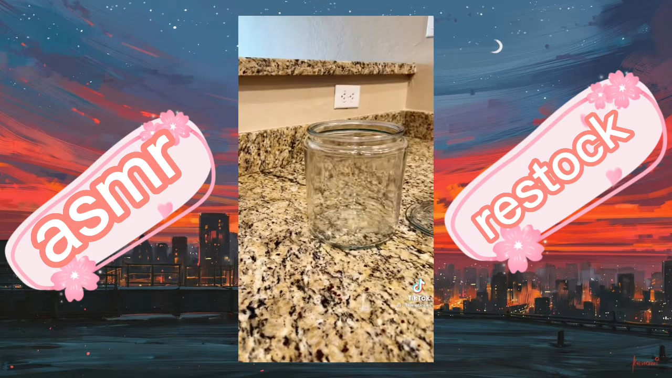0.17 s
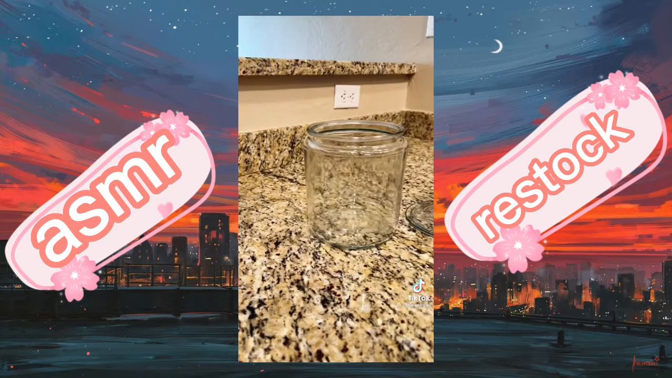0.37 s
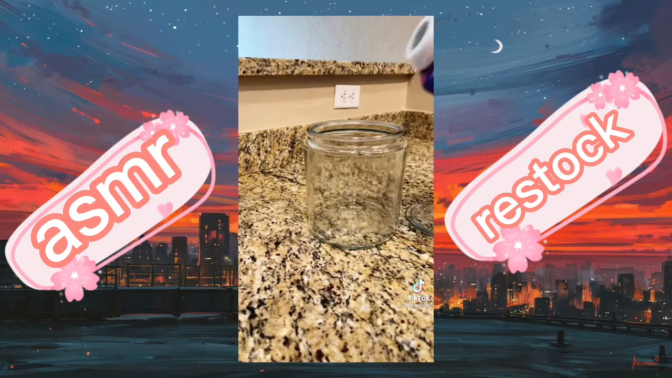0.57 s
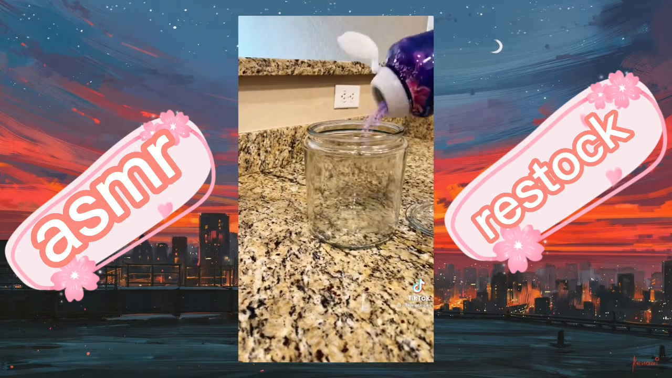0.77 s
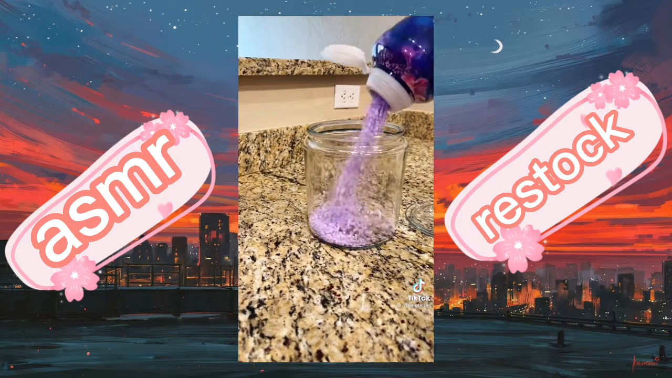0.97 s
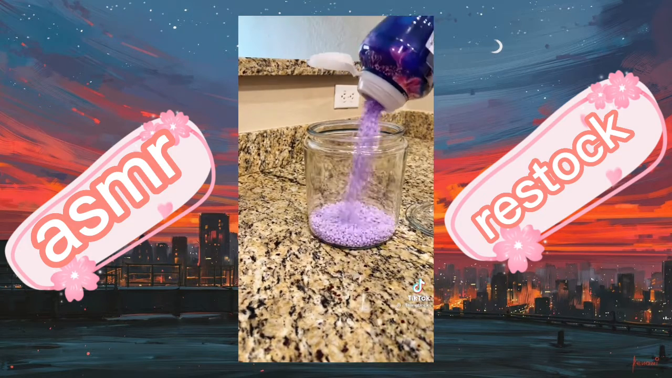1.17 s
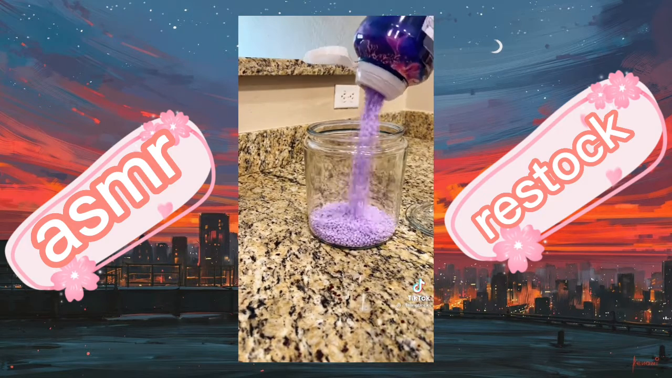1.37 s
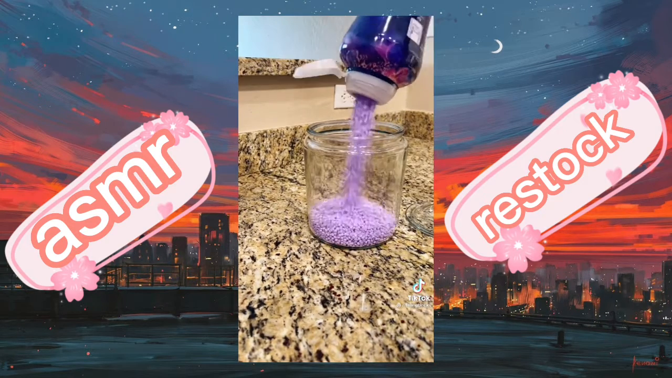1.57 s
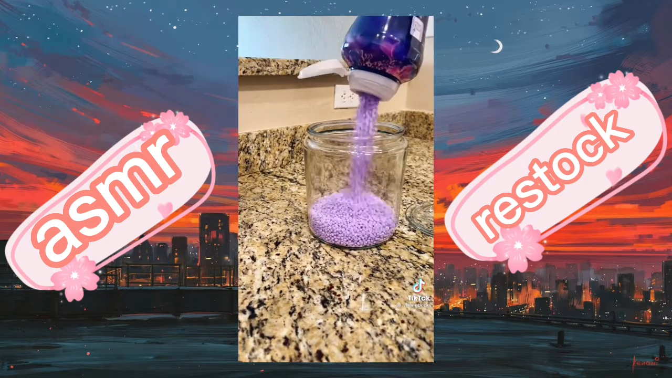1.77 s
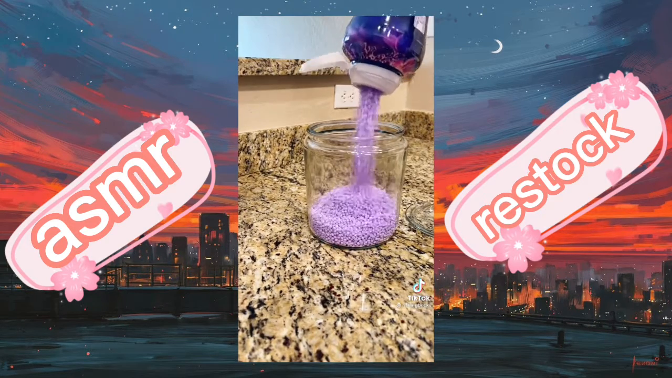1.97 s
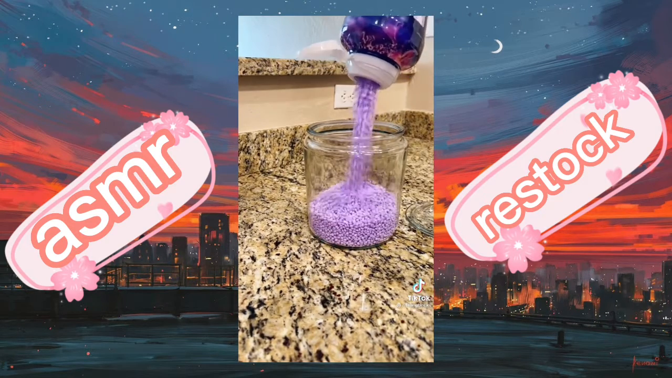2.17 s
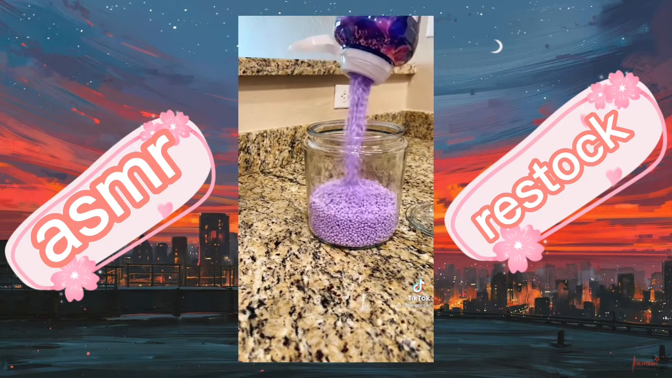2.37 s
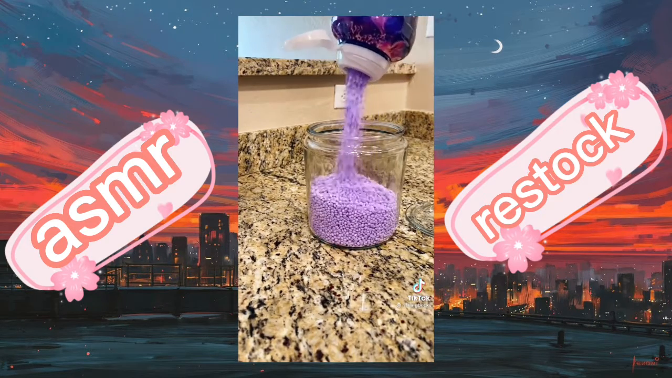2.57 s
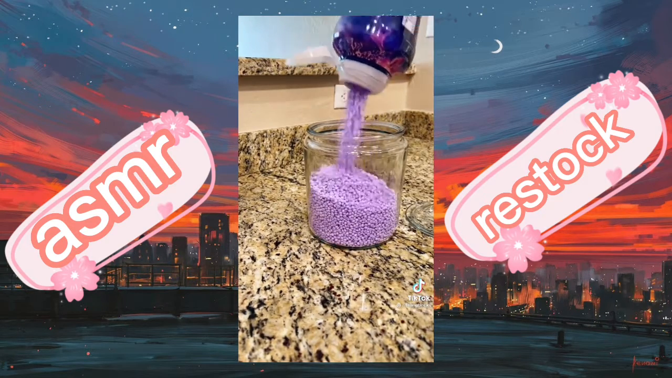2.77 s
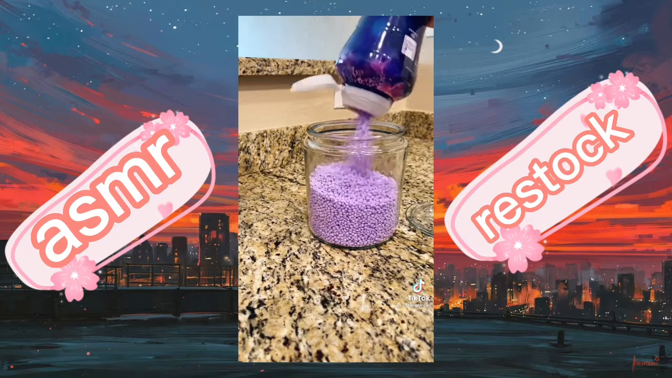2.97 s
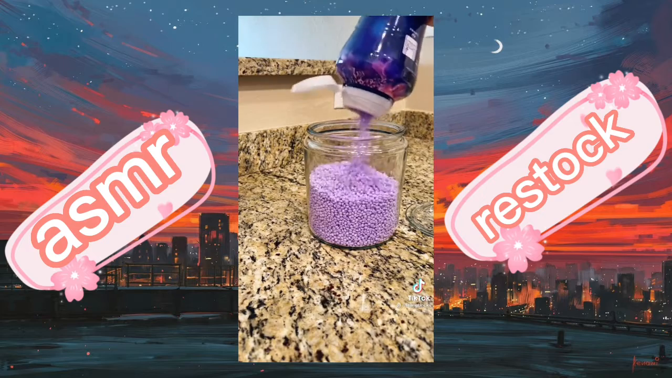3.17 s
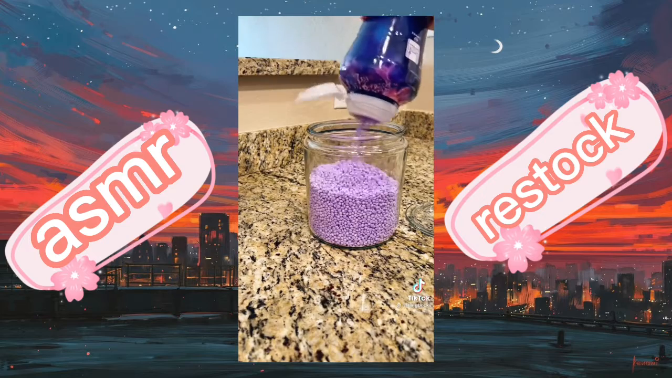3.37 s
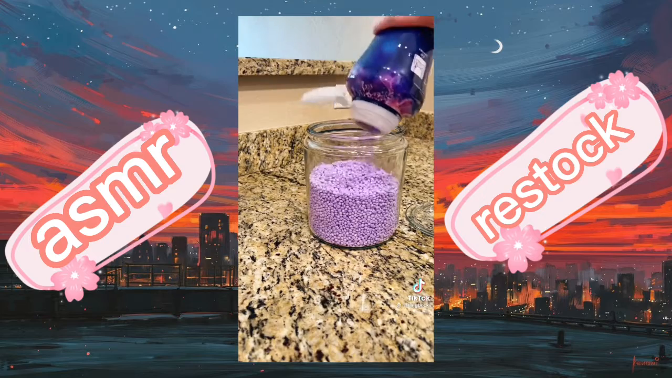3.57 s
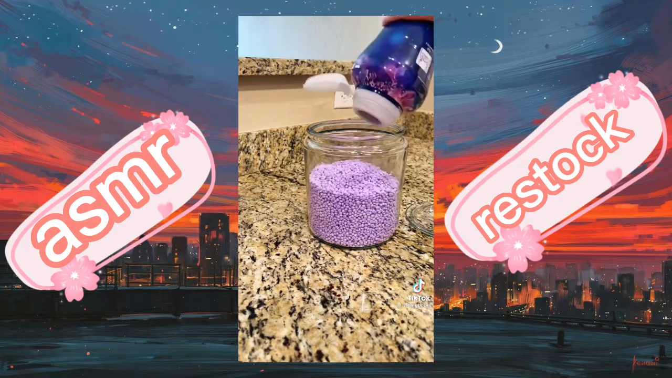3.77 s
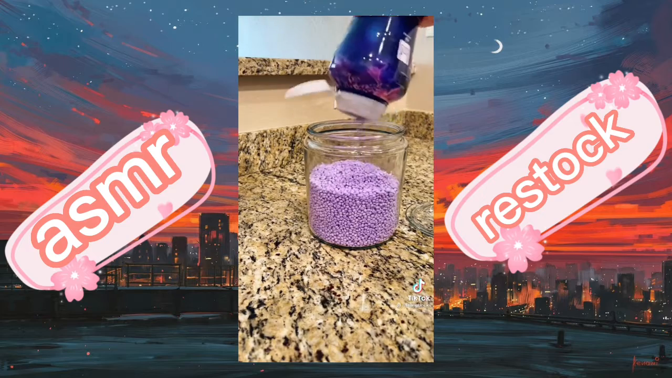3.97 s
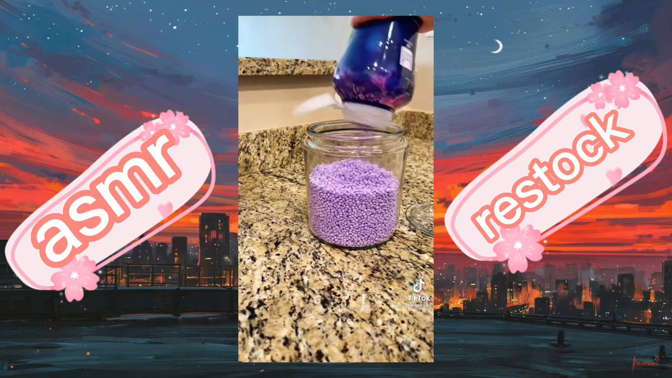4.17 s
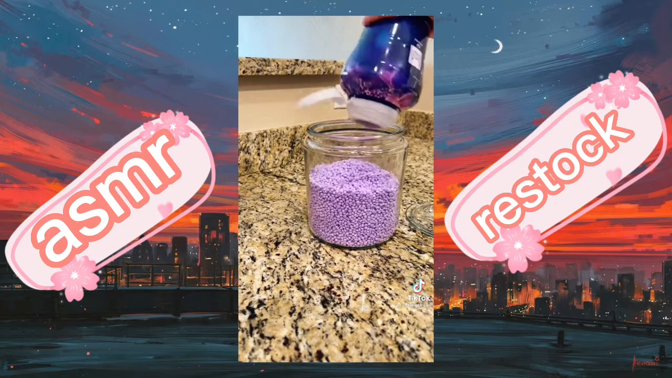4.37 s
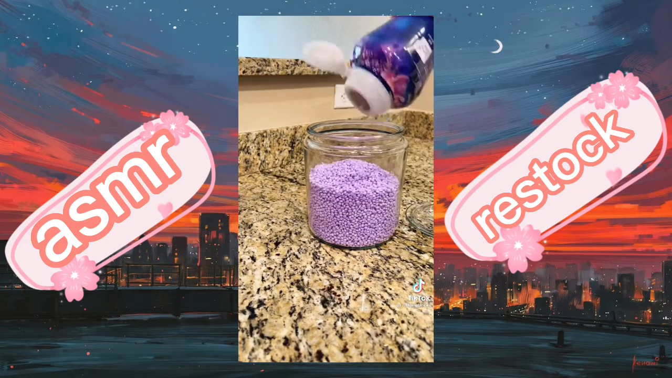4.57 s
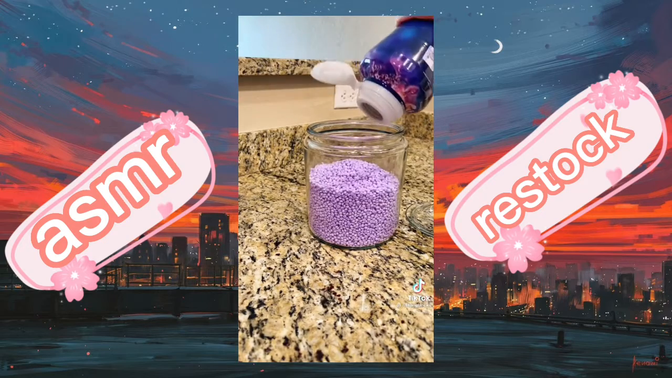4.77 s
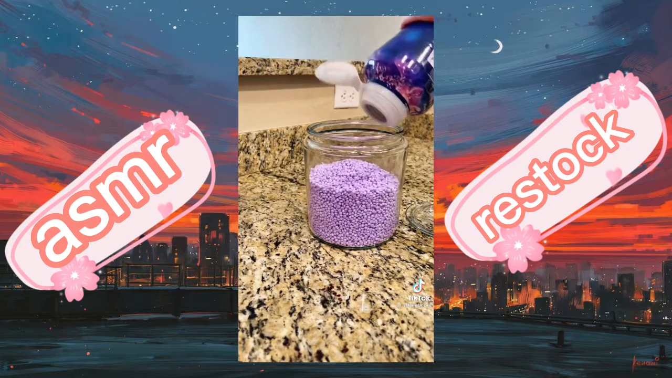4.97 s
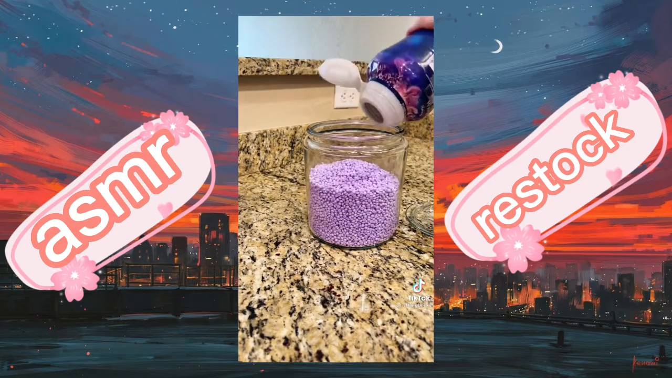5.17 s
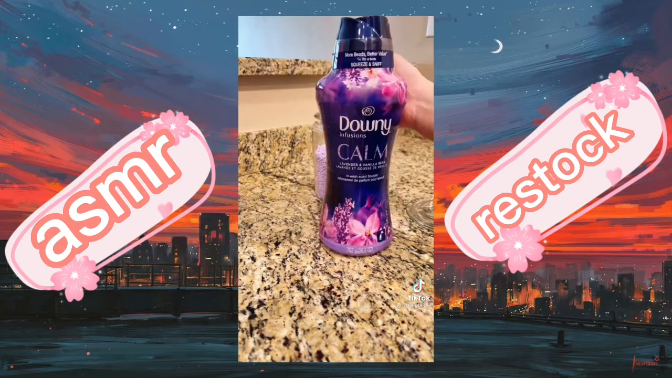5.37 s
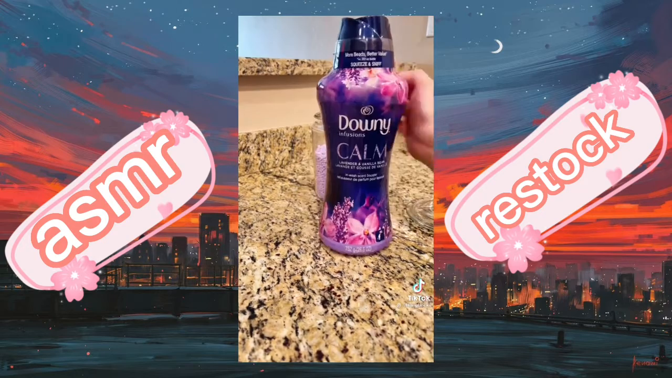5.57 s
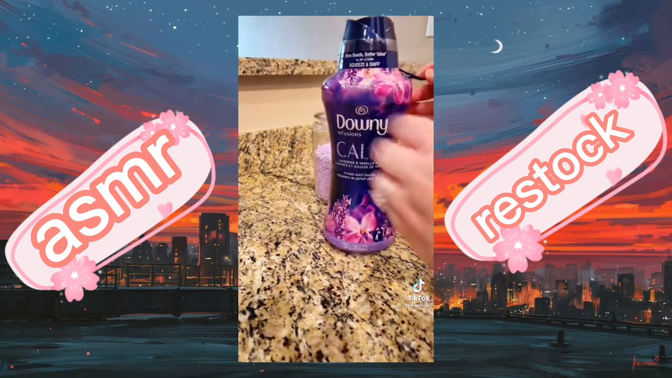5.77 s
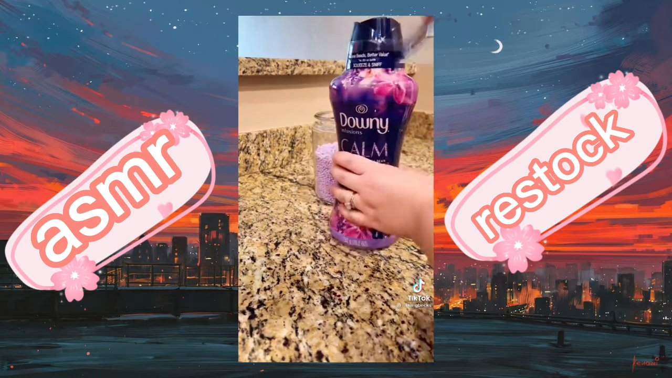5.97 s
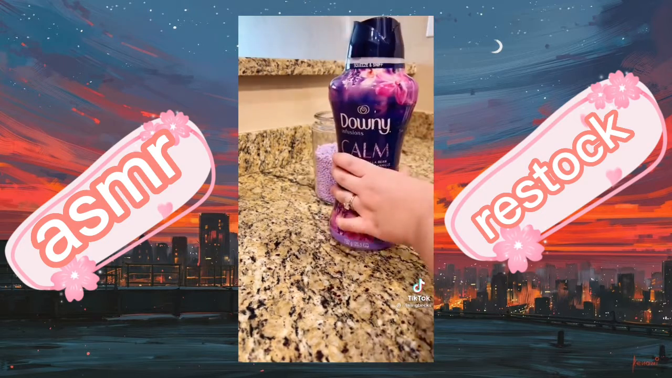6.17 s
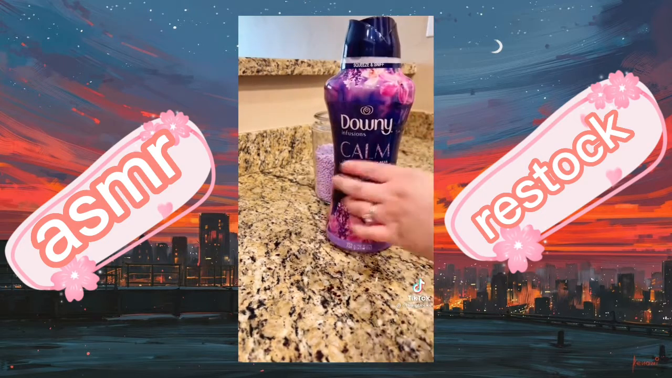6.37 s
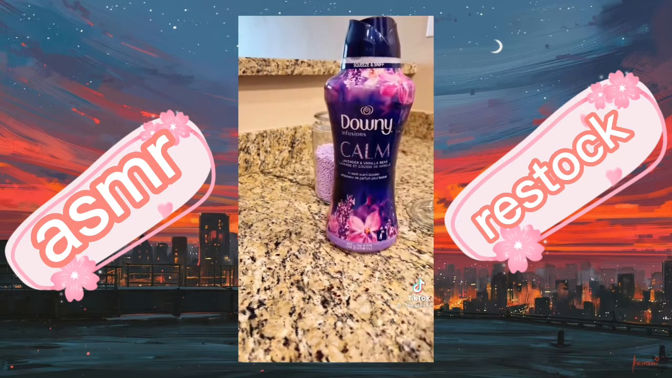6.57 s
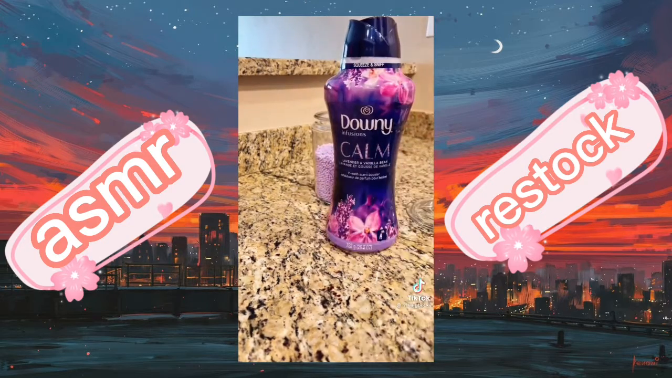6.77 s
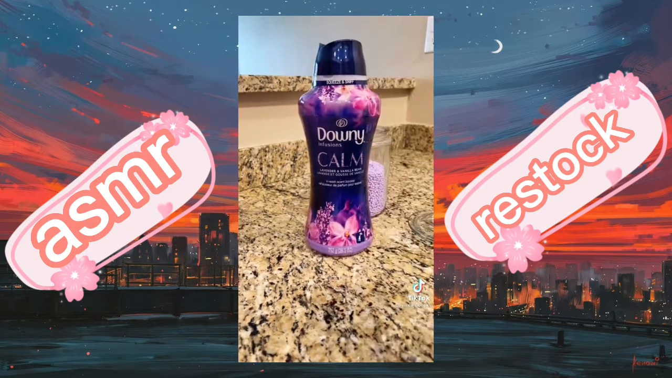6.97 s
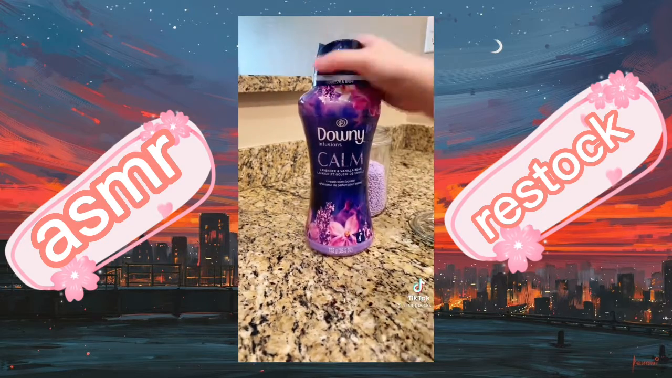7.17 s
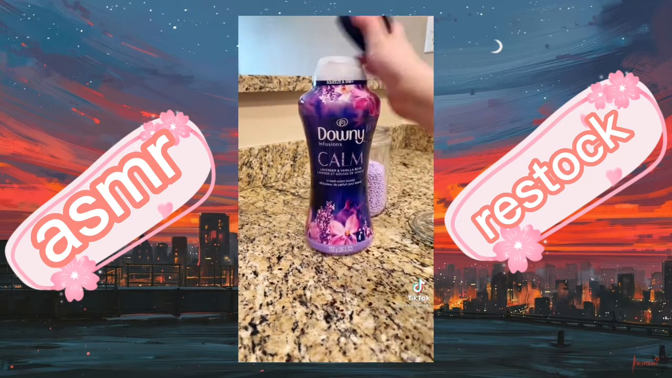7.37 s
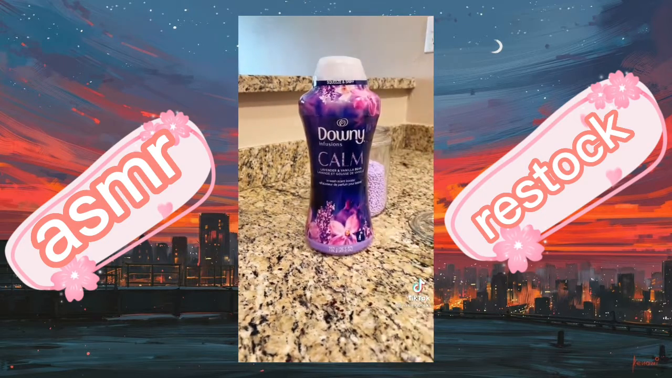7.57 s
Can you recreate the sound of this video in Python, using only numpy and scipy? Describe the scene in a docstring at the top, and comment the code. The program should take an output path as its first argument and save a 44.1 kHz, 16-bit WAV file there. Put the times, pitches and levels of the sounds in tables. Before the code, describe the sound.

A brief rattle of beads in a bottle swells into a fast pour on bare glass, tinkling sharply before turning into a softer, dense patter. The flow thins, with loud clacks and hollow plastic thuds as the bottle is shaken. Quiet hand scuffs and crisp wrap snaps follow a short dropout, then a hollow cap pop and a hard clack on the counter. Close, dry, small kitchen echo and faint rumble.

```python
"""Scent beads slide to a plastic bottle's neck and pour into a glass jar on a stone counter, close to a phone.
The bare glass rings until the growing heap smothers it; the last beads are shaken and thumped out.
After a short silence a second bottle is handled and its wrap torn. After another, its cap is
pulled off and set down. Beads, scuffs and tears are random impacts sent through filters and resonances;
the hollow bottle is a set of fading tones, and the kitchen adds a short echo and a low rumble."""
import sys
import numpy as np
from scipy import signal
from scipy.io import wavfile
from scipy.ndimage import uniform_filter1d

SR = 44100
rng = np.random.default_rng(int(sys.argv[2]) if len(sys.argv) > 2 else 0)


def put_to_file(sound):
    """Save the sound as 16-bit audio at rate SR, in the file named by the first command-line argument."""
    columns = np.atleast_2d(sound).T  # one column per channel
    safe = np.clip(columns, -1, 1)
    whole_steps = np.round(safe * 32767)
    wavfile.write(sys.argv[1], SR, whole_steps.astype(np.int16))


N = 336042
T = np.arange(N) / SR

# All levels in dB are relative. A colour is a table of how strongly each frequency comes through.
# colour of beads striking the plastic bottle: (f/Hz, level/dB)
BOTTLE_COLOUR = [(88, -41), (150, -8.5), (352, -17), (428, -11), (572, -20.5), (1150, -14.5), (1660, -20.5),
                 (1760, -13.5), (2550, -9), (3280, -0.5), (6350, -12), (9920, -9.5), (12300, -17),
                 (14600, -16), (15500, -13)]
# colour of beads landing on the heap: (f/Hz, level/dB)
HEAP_COLOUR = [(59, -41), (100, -11.5), (243, -11), (300, -17.5), (386, -9.5), (552, -14.5), (956, -13.5),
               (1210, -6.5), (1690, -9.5), (2990, -2), (6000, -9), (9150, -6.5), (12600, -8), (14500, -2),
               (15500, -6.5)]
# stretches of silence: (start/s, end/s)
SILENT_SPANS = [(0, .07), (5.256, 5.378), (6.838, 6.935)]


def amp(db):
    """Turns decibels into a gain."""
    return np.exp(np.asarray(db) * np.log(10) / 20)


def unit(x):
    """Scales a sound to an rms of 1."""
    return x / np.sqrt(np.mean(x ** 2) + 1e-20)


def level(rows, fade=.02):
    """Gain along a (t/s, level/dB) curve, fading out beyond its ends."""
    s, db = np.transpose(rows)
    fades = np.interp(T, [s[0] - fade, s[0], s[-1], s[-1] + fade], [0, 1, 1, 0])
    return amp(np.interp(T, s, db)) * fades


def add(mix, s, sound):
    """Mixes a sound in at a time in seconds."""
    part = mix[max(round(s * SR), 0):][:len(sound)]
    part += sound[:len(part)]


def colour(x, points, bright_db=0):
    """Causal filter of unit energy; brightness lifts the part above 6 kHz and lowers the part below."""
    hz = np.fft.rfftfreq(2048, 1 / SR) + 1  # keeps the logarithm finite
    f, db = np.transpose(points)
    db = np.interp(np.log(hz), np.log(f + 1), db)
    db = db + bright_db * np.tanh(2 * np.log(hz / 6000))
    both_sides = np.r_[db, db[-2:0:-1]]
    log_gain = np.log(amp(np.maximum(both_sides, -100)))
    # minimum phase: the filter answers at once, without an echo ahead of the hit
    taps = np.fft.ifft(np.exp(np.conj(signal.hilbert(log_gain)))).real
    return signal.oaconvolve(x, taps / np.linalg.norm(taps))[:len(x)]


def patter(per_s, spread_db, size=N):
    """Random tiny impacts, most small and a few large, at an rms of 1."""
    hit = rng.random(size) < per_s / SR
    strength = amp(spread_db * np.minimum(rng.exponential(1, size), 4))
    return unit(hit * strength * rng.choice([-1, 1], size))


def clumping(depth_db, span):
    """Gain that wanders, with a new random level every span seconds, as grains arrive in bunches."""
    wander = rng.standard_normal(size=8000)
    return unit(np.interp(T, np.arange(len(wander)) * span, amp(depth_db * wander)))


def ring(x, resonances):
    """Impacts ring a set of (f/Hz, width/Hz, level/dB) resonances; a narrow one rings longer."""
    t = np.arange(SR // 6) / SR
    taps = 0
    for hz, width, db in resonances:
        taps = taps + amp(db) * width * np.exp(-np.pi * width * t) * np.cos(2 * np.pi * hz * t)
    return signal.oaconvolve(x, taps / np.linalg.norm(taps))[:len(x)]


def bursts(rows, points, per_s, spread_db):
    """Swells of many small impacts, each rising and dying smoothly around its time."""
    out = np.zeros(N)
    for s, db, half, bright_db in rows:
        t = np.arange(-3 * half, 4 * half, 1 / SR)
        swell = 1 / np.cosh(t / half) ** 1.37
        impacts = swell * patter(per_s, spread_db, size=len(t))
        add(out, s - 3 * half, amp(db) * colour(impacts, points, bright_db))
    return out


def clicks(rows, points, decay_s, tail_db, tail_s):
    """Sharp hits, each a tight volley of impacts and a weaker scatter after it."""
    out, t = np.zeros(N), np.arange(SR // 8) / SR
    fading = np.exp(-t / decay_s) + amp(tail_db) * np.exp(-t / tail_s)
    shape = (1 - np.exp(-t / 0.00072)) * fading
    for s, db, bright_db in rows:
        hit = colour(shape * patter(14000, 2.12, size=len(t)), points, bright_db)
        add(out, s, amp(db) * hit / abs(hit).max())
    return out


def strokes(rows, rise_s, sag_db_per_s, release_s):
    """Gain of a series of movements: each rises, sags from its start on, and dies away after its end."""
    power = np.zeros(N)
    for start, end, db in rows:
        t = np.maximum(T - start, 0)
        rise = 1 - np.exp(-t / rise_s)
        release = np.exp(-np.maximum(T - end, 0) / release_s)
        power += (amp(db + sag_db_per_s * t) * rise * release) ** 2
    return np.sqrt(power)


def stream():
    """Falling beads ring the bare base, then the walls, and as the heap deepens only patter on it."""
    # flow of beads into the jar, thinning to a dribble: (t/s, level/dB)
    flow_curve = [(.83, -10), (.866, 0), (1.15, 0), (1.27, -1.5), (1.43, 0), (1.56, 3), (1.7, 1),
                  (2.95, -1), (3.13, -9), (3.55, -11)]
    # the jar's bare base: (f/Hz, width/Hz, level/dB)
    base_modes = [(2280, 22, -7.5), (2310, 14, 2), (2930, 26, -9.5), (3210, 60, -10.5), (4234, 14, 2.5),
                  (4250, 14, -1), (4530, 16, -4), (6440, 32, -14), (6830, 90, -10), (7600, 100, -10.5),
                  (8540, 23, -10.5), (8800, 24, 0.5), (9140, 30, -3), (10030, 43, -2.5), (11060, 25, -2.5),
                  (11420, 46, -9), (11800, 60, -13), (12850, 120, -10), (14140, 31, 2), (14210, 45, -6),
                  (14600, 28, -7.5), (15400, 120, -14)]
    # the jar's walls above the heap: (f/Hz, width/Hz, level/dB)
    wall_modes = [(2930, 30, -2.5), (3040, 73, -6.5), (4310, 23, -2.5), (4400, 28, -0.5), (4480, 19, -2.5),
                  (6450, 32, -1), (8540, 28, -6), (8800, 37, -3.5), (8870, 35, 3), (10850, 120, -5.5),
                  (11400, 60, -1.5), (13660, 41, -2.5), (14200, 110, -2.5), (15200, 90, -5.5)]
    # the air in the jar's mouth: (f/Hz, width/Hz, level/dB)
    air_modes = [(416.5, 60, -5), (704, 84, -9), (1218, 82, 0.5), (2980, 230, 3)]
    # colour of a bead's tick on bare glass: (f/Hz, level/dB)
    glass_colour = [(200, -31.5), (1500, -20.5), (2500, -1.5), (4000, 2.5), (5500, -4), (9000, -4.5),
                    (12300, -5), (15000, -7.5)]

    flow = level(flow_curve, fade=0.035)
    depth = 2.92 * np.cumsum(flow) / SR  # in cm; the heap rises 2.92 cm per s at a flow of 0 dB
    covered = (1 + np.tanh((depth - 1.06) / .18)) / 2  # its foot spreads over the base around 1.06 cm
    heap = amp(-20.5 - 2 * (1 - covered))  # 2 dB weaker while the base is bare
    base = amp(-9.8 - 8.5 * covered - 5.5 * depth)  # a step down once covered, and 5.5 dB less per cm
    glancing = 1 - np.exp(-depth / .6)  # beads glance off the heap onto the walls
    smothering = np.exp(-(depth / 5.0) ** 2)  # a deep heap smothers the walls
    wall = amp(-20.5) * glancing * smothering

    beads = patter(12000, 2.0) * clumping(1.5, 0.0037)
    hard_hits = patter(1100, 3.2) * clumping(1.8, .012)
    wall_hits = patter(1500, 3.2) * clumping(2.5, .02)
    on_heap = colour(beads, HEAP_COLOUR) + amp(-12.0) * ring(patter(5000, 2.2), air_modes)
    on_base = amp(0.14) * ring(hard_hits, base_modes) + amp(-6) * colour(beads, glass_colour)
    on_glass = base * on_base + wall * ring(wall_hits, wall_modes)
    # stiff glass radiates little bass
    on_glass = signal.lfilter(*signal.butter(2, 1400, "high", fs=SR), on_glass)
    return flow * (heap * on_heap + on_glass)


def bottle_beads():
    """Beads slide to the neck like an avalanche, then surge, clack and roll; stragglers drop on the heap."""
    # the first slide: (full speed at t/s, end/s, level/dB, growth/dB per s)
    slide = (0.64, 0.82, -16, 331)
    # tilts and shakes that set the beads rolling: (start/s, end/s, level/dB)
    shakes = [(.5, .56, -44), (.565, .6, -22.5), (2.97, 3.1, -23.5), (3.14, 3.625, -22.2),
              (3.67, 3.735, -26.5), (3.85, 3.868, -24.5), (3.95, 4.25, -22.5), (4.27, 4.3, -26.5),
              (4.34, 4.465, -24), (4.61, 4.88, -28), (4.97, 5.085, -26)]
    # a few beads that keep rolling: (start/s, end/s, level/dB)
    strays = [(3.698, 5.2, -40)]
    # masses of beads thrown against the shoulder: (t/s, level/dB, half length/s, brightness/dB)
    surges = [(.437, -46.5, .014, 10.5), (.611, -15.5, 0.0075, 4), (.64, -12.5, 0.016, 6.5),
              (2.996, -16.5, 0.0083, 3.5), (3.185, -9.5, 0.0095, -1), (3.458, -10.5, .012, 5),
              (3.53, -19.5, 0.017, 4), (4.067, -9, 0.0098, -2), (4.15, -19.5, 0.011, 5),
              (4.215, -16.5, .011, 2.5)]
    # colour of such a mass against the plastic: (f/Hz, level/dB)
    surge_colour = [(240, -50), (400, -21), (643, -31), (2290, -15.5), (2880, -2.5), (3510, 0.5),
                    (6190, -12.5), (10600, -14.5), (11900, -25.5), (14400, -19), (15500, -20)]
    # clumps of beads striking the plastic: (t/s, peak level/dB, brightness/dB)
    clacks = [(.4963, -28, -0.5), (.544, -22, 0.5), (.5681, -14, -0.5), (3.056, -7, 0), (3.1048, 1, 4),
              (3.3154, -4, 3), (3.3711, -1, 3), (3.4346, -5, -1), (3.505, 3.5, 4), (3.5788, 3, 2.5),
              (3.6416, -3, 3), (3.6692, 5, 1.5), (3.7221, 2, 1), (3.7774, -6, -1.5), (3.8528, -7.5, 3.5),
              (4.0174, 0, 1), (4.061, 1, 0), (4.1195, -1.5, -2.5), (4.1899, -5.5, 0), (4.2656, 3, 5),
              (4.3151, -6, -3), (4.4932, -13, -1), (4.5371, -15.5, 1), (4.6543, -10.5, 1), (4.81, -9, -3),
              (4.85, 3, 2), (4.9405, -1, 1), (4.9748, -6, 1), (5.007, -1, 2), (5.0612, 0, 1),
              (5.1123, -.5, 1), (5.2036, -8, 1)]
    settle_s = 0.032  # how quickly the beads come to rest

    rattle = patter(7500, 2.8) * clumping(1.6, 0.0044)
    rattling = colour(rattle, BOTTLE_COLOUR, bright_db=-0.1)
    full, end, slide_db, growth_db_per_s = slide
    growing = amp(slide_db - growth_db_per_s * np.maximum(full - T, 0))
    avalanche = growing * np.exp(-np.maximum(T - end, 0) / settle_s)
    # the full bottle hardly booms
    sliding = avalanche * signal.lfilter(*signal.butter(1, 1100, "high", fs=SR), rattling)

    dropping = colour(patter(2500, 4.1), HEAP_COLOUR, bright_db=-3.5)
    ticking = colour(patter(900, 2.5), surge_colour)  # single beads bounce on the wall as they roll
    rolling = strokes(shakes + strays, rise_s=0.012, sag_db_per_s=-4, release_s=settle_s)
    shaking = (amp(-2) * rattling + amp(-5) * dropping + amp(-5.5) * ticking) * rolling
    surging = bursts(surges, surge_colour, per_s=12000, spread_db=1.5)
    clacking = clicks(clacks, BOTTLE_COLOUR, decay_s=.0029, tail_db=-18.5, tail_s=0.029)
    return sliding + shaking + amp(0.95) * surging + amp(-.5) * clacking


def thumps():
    """Each blow smacks and rings the hollow bottle, damped by the grip; a soft contact favours the low modes."""
    # blows of the hand that shake the bottle: (t/s, level/dB, contact time/s)
    blows = [(.878, -22.5, 0.0055), (3.603, -9, .0016), (3.677, -10.5, .003), (3.694, -10, .0024),
             (3.719, -12.5, 0.0027), (3.779, -4.5, .0008), (4.852, .5, .0008), (4.926, -11.5, 0.0025),
             (4.942, -5, .0007), (5.012, -10, .0037), (5.027, -1.5, .004), (5.055, -6, 0.0057),
             (5.115, -1.5, .0009), (5.204, -7, .0007)]
    # the hollow bottle's modes: (f/Hz, level/dB, time to fall 60 dB when not gripped/s)
    bottle_modes = [(130.5, -9.5, 0.092), (174.6, -3, 0.22), (205, -6, .08), (246, -5.5, 0.074),
                    (356, -6.5, 0.068), (433.7, -5, 0.13), (500, -9, 0.063), (592, -18.5, 0.081),
                    (720, -16, 0.13), (860, -21.5, .09), (1044, -18, 0.088), (1153, -11.5, 0.11),
                    (1410, -18.5, .09), (1630, -17, .07), (2090, -16, 0.051)]
    # colour of the smack of a hard blow on the wall: (f/Hz, level/dB)
    smack_colour = [(30, -26), (70, -14.5), (150, -4), (400, -1.5), (700, -6), (1300, -9.5), (2200, -10.5),
                    (3500, -17.5), (8000, -36.5), (15000, -44)]

    out, t = np.zeros(N), np.arange(SR // 3) / SR
    hz, db, t60 = np.transpose(bottle_modes)[:, :, None]
    t60 = .55 * t60  # share of the ring time that the grip leaves
    for s, blow_db, contact in blows:
        detune = 1 + 0.023 * rng.standard_normal(hz.shape)
        build_up = 1 - np.exp(-t * hz / 0.89)  # a mode swells over about its first cycle
        tones = np.sin(2 * np.pi * (hz * detune * t + rng.random(hz.shape)))
        modes = amp(db - 60 * t / t60) * build_up * tones
        thud = (modes / (1 + (hz * contact) ** 2)).sum(0)
        smack_shape = (1 - np.exp(-t / 0.0023)) * np.exp(-t / .009)
        smack = colour(rng.standard_normal(len(t)) * smack_shape, smack_colour)
        hardness = 1 / (1 + contact / .002)
        blow = amp(-1) * thud / abs(thud).max() + amp(-5.0) * hardness * smack
        add(out, s, amp(blow_db) * blow)
    return out


def handling():
    """Skin scuffs and rubs on plastic; the wrap snaps, its rips ring the bottle's shoulder, the cap clicks."""
    # strokes of the hand over the second bottle and its cap: (start/s, end/s, level/dB)
    rubs = [(5.495, 5.55, -48.5), (5.62, 5.66, -49.5), (5.71, 5.84, -41.5), (5.91, 6.07, -39),
            (6.18, 6.31, -41), (6.37, 6.61, -44.5), (6.47, 6.61, -41), (6.68, 6.83, -53),
            (7.245, 7.275, -36), (7.31, 7.41, -45), (7.46, 7.55, -49)]
    # colour of the rubbing skin: (f/Hz, level/dB)
    skin_colour = [(120, -26), (200, -1), (812, -10.5), (1050, -4), (1210, -10), (2470, -6.5), (8660, -17),
                   (12500, -23), (15500, -16.5)]
    # scuffs of the palm as it takes hold: (t/s, level/dB, half length/s, brightness/dB)
    scuffs = [(5.976, -17, .015, 2.5), (6.025, -25, .013, -5.5)]
    # colour of the palm scuffing onto the bottle: (f/Hz, level/dB)
    palm_colour = [(59, -38), (100, -7), (181, -1), (281, -28), (326, -5.5), (411, -14), (742, -6),
                   (1840, -10.5), (2090, -14), (2320, -9), (2520, -14), (3250, -8.5), (15500, -22.5)]
    # rips of the wrap: (t/s, level/dB, half length/s, brightness/dB)
    rips = [(6.138, -30.5, 0.0083, 0.5), (6.189, -26, .012, -4.5), (6.256, -23, .018, 1),
            (6.745, -42, 0.014, -3.5)]
    # snaps of the wrap: (t/s, peak level/dB, brightness/dB)
    snaps = [(5.8232, -24, 9), (6.0247, -4.5, 2), (6.1455, 0, 1), (6.1836, -13, -3), (6.2395, -3, 0.5),
             (6.3627, -30, 1)]
    # colour of the wrap: (f/Hz, level/dB)
    wrap_colour = [(120, -36), (200, -4), (288, -17), (365, -13.5), (618, -11.5), (1110, -11),
                   (1710, -14.5), (2850, -3.5), (4260, -5), (4840, -5), (10200, -9), (12000, -18.5),
                   (15500, -11.5)]
    # the full bottle's shoulder under the wrap: (f/Hz, width/Hz, level/dB)
    shoulder_modes = [(3460, 90, -3), (4510, 60, -6), (4800, 45, 3), (4890, 45, 0), (5560, 77, -3)]
    # the cap working loose and leaving the neck: (t/s, peak level/dB, brightness/dB)
    cap_clicks = [(7.2122, -27.5, -3), (7.247, -24, -6), (7.2536, -19, -4.5), (7.3961, -17.5, -3)]

    stroking = strokes(rubs, rise_s=0.011, sag_db_per_s=-13, release_s=0.042)
    rubbing = colour(patter(9000, 2.6), skin_colour) * stroking
    scuffing = bursts(scuffs, palm_colour, per_s=6000, spread_db=3.5)
    ripping = bursts(rips, wrap_colour, per_s=5000, spread_db=2.5)
    snapping = clicks(snaps, wrap_colour, decay_s=0.0036, tail_db=-26, tail_s=0.017)
    shoulder = amp(-11) * ring(ripping, shoulder_modes)
    clicking = clicks(cap_clicks, BOTTLE_COLOUR, decay_s=0.0026, tail_db=-18, tail_s=.015)
    return rubbing + scuffing + ripping + snapping + shoulder + clicking


def cap(row, points, modes, knock_s, rise_s, scrape_band_hz):
    """A brief scrape that builds up, a hard knock, and the hollow cap ringing on."""
    s, knock_db, scrape_db, lead, ring_db, t60 = row
    t = np.arange(-lead, .3, 1 / SR)  # the knock falls at t = 0
    after = np.maximum(t, 0)
    scrape_gain = amp(scrape_db) * np.minimum((t + lead) / rise_s, 1) ** 2
    shape = np.where(t < 0, scrape_gain, amp(ring_db - 60 * after / t60))
    chatter = rng.standard_normal(SR)
    hollow = ring(chatter, modes) + amp(-9) * colour(chatter, points)
    # a light touch rings only some of the modes
    scrape = signal.lfilter(*signal.butter(1, scrape_band_hz, "band", fs=SR), hollow)
    body = np.where(t < 0, unit(scrape)[-len(t):], unit(hollow)[-len(t):])
    knock = colour((t >= 0) * np.exp(-after / knock_s) * rng.standard_normal(len(t)), points)
    out = np.zeros(N)
    add(out, s - lead, shape * body + amp(knock_db) * knock / abs(knock).max())
    return out


def cap_off():
    """The cap is pulled off: it scrapes and knocks on the bottle, which colours its ring."""
    # the pull: (t/s, knock level/dB, scrape level/dB, scrape length/s, ring level/dB, ring t60/s)
    pull = (7.318, 2.5, -12.5, .022, -14, 0.14)
    # colour of the knock: (f/Hz, level/dB)
    knock_colour = [(29, -41), (50, -16), (108, -6), (262, -2.5), (333, -6), (718, -1), (829, -9),
                    (1000, 2.5), (1830, -15.5), (2620, -24), (3100, -6), (4670, -24), (8110, -23),
                    (9360, -12.5), (15500, -39)]
    # resonances of the cap on the bottle: (f/Hz, width/Hz, level/dB)
    cap_modes = [(717, 210, 0.5), (910, 34, -8), (1090, 37, 7), (1200, 21, -9), (1570, 110, -6),
                 (2060, 65, -17), (3100, 31, -7), (3400, 24, -16)]
    return cap(pull, knock_colour, cap_modes, knock_s=0.0026, rise_s=0.014, scrape_band_hz=[200, 9000])


def cap_down():
    """The cap is set down: it scrapes, knocks and rings on the stone counter."""
    # the landing: (t/s, knock level/dB, scrape level/dB, scrape length/s, ring level/dB, ring t60/s)
    landing = (7.584, 5, -17, .021, -19, .7)
    # colour of the knock: (f/Hz, level/dB)
    knock_colour = [(120, -60), (200, -31), (596, -23.5), (1350, 1), (1560, -8), (1840, -4), (2700, -20),
                    (3010, -15), (3680, -37), (4100, -30), (4920, -40), (8050, -27), (15500, -37)]
    # resonances of the cap on the counter: (f/Hz, width/Hz, level/dB)
    cap_modes = [(1116, 36, 5), (1356, 58, 2), (1630, 60, -6), (1820, 61, -5), (2170, 86, -9)]
    return cap(landing, knock_colour, cap_modes, knock_s=0.0019, rise_s=0.0068, scrape_band_hz=[1600, 2300])


def kitchen(x, t60, dull_hz):
    """A short, slightly dull tail of random echoes from counter and walls."""
    t = np.arange(SR // 2) / SR
    echoes = rng.standard_normal(len(t)) * (rng.random(len(t)) < .06)
    taps = echoes * amp(-60 * t / t60) * (t > .004)
    taps = signal.lfilter(*signal.butter(1, dull_hz, fs=SR), taps)
    return signal.oaconvolve(x, taps / np.linalg.norm(taps))[:N]


def background():
    """The kitchen's low rumble is filtered noise; the phone's automatic gain raises it again after each silence."""
    # colour of the rumble: (f/Hz, level/dB)
    room_colour = [(25, -20.5), (75, -12.5), (133, -2), (190, -12.5), (400, -18.5), (800, -23),
                   (1600, -27.5), (4000, -34), (12000, -39.5), (15500, -40.5)]
    since = T  # seconds since the last silence
    for _, end in SILENT_SPANS:
        since = np.where(T >= end, T - end, since)
    quick_gain_db = 7.5 * (1 - np.exp(-(since / 0.32) ** 2))  # the gain rises quickly
    slow_gain_db = 1.44 * since  # and keeps creeping up
    return amp(-55.5 + quick_gain_db + slow_gain_db) * colour(rng.standard_normal(N), room_colour)


def scene():
    """All sources reach one microphone, with their echo, over the kitchen's low rumble."""
    near = stream() + bottle_beads() + thumps() + handling() + cap_off() + cap_down()
    mono = near + amp(-17.5) * kitchen(near, t60=0.31, dull_hz=6000) + background()
    return np.array([mono, mono])


def record(dry):
    """The sound drops out briefly, peaks are clipped, and the treble is cut off at about 15650 Hz."""
    live = np.ones(N)
    for start, end in SILENT_SPANS:
        live[(T >= start) & (T < end)] = 0
    clipped = np.clip(dry * uniform_filter1d(live, size=130), -1, 1)  # short fades at the edges
    lowpass = signal.firwin(401, 15650, window=("kaiser", 8), fs=SR)
    return signal.oaconvolve(clipped, lowpass[None], "same")


dry = scene()
out = record(dry)
put_to_file(out)
```